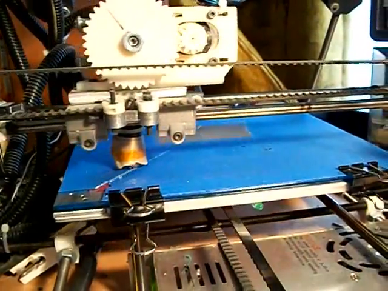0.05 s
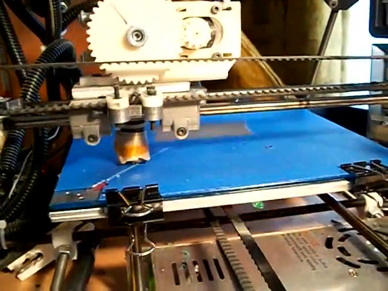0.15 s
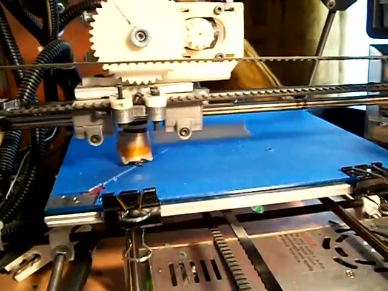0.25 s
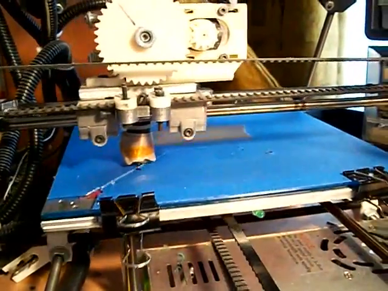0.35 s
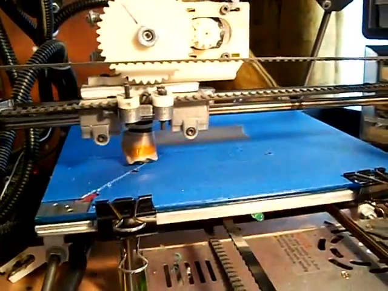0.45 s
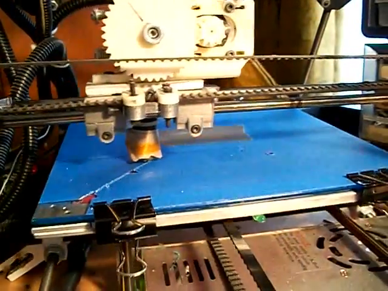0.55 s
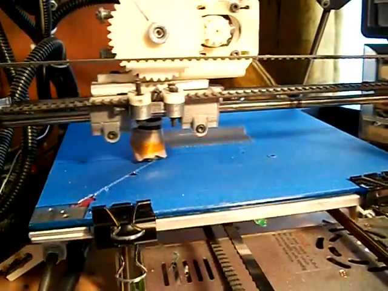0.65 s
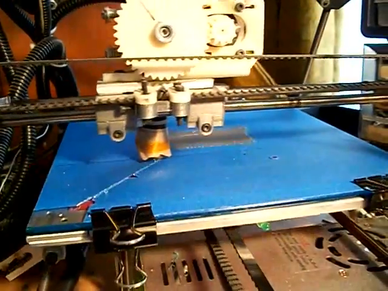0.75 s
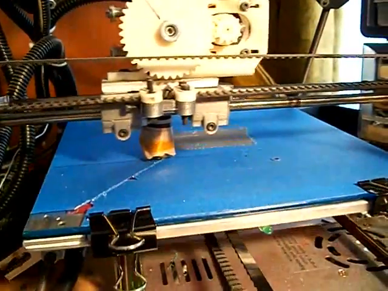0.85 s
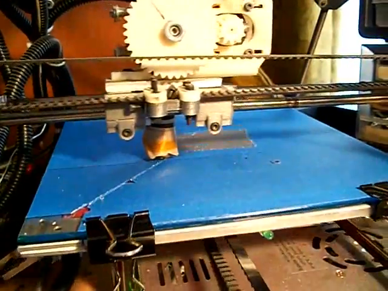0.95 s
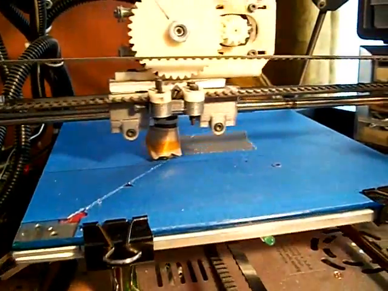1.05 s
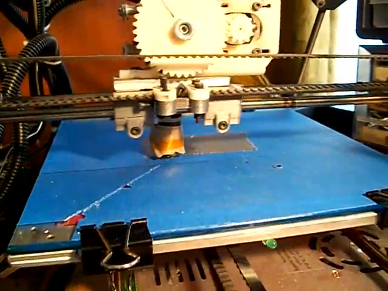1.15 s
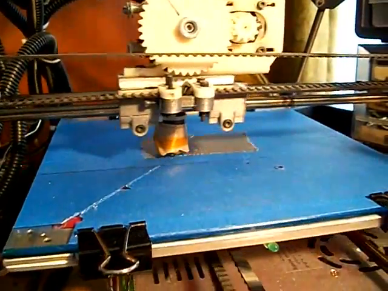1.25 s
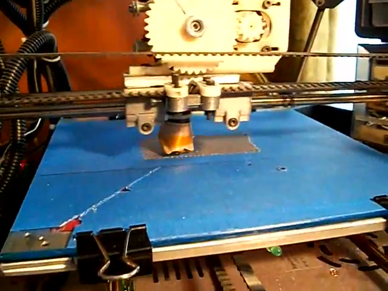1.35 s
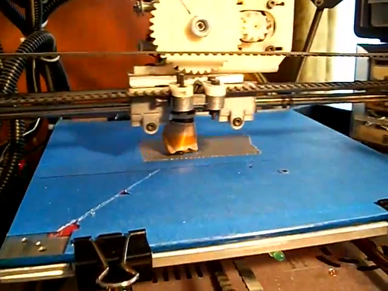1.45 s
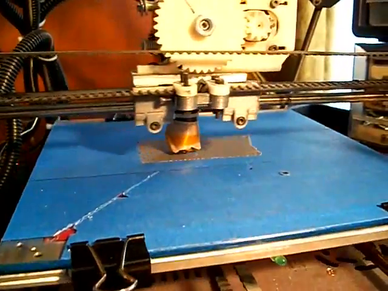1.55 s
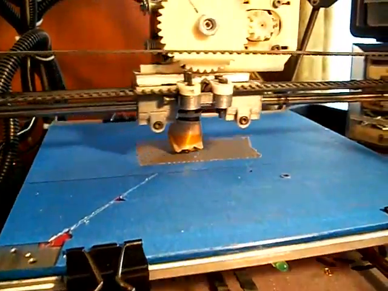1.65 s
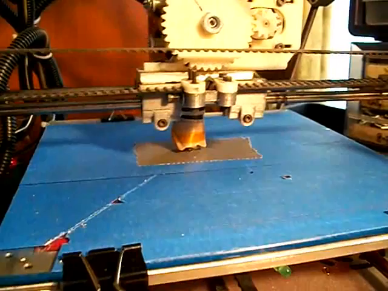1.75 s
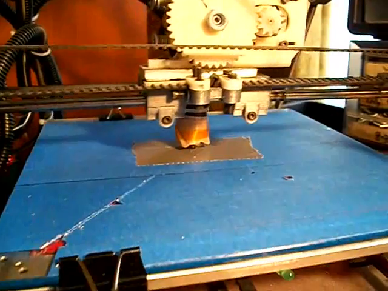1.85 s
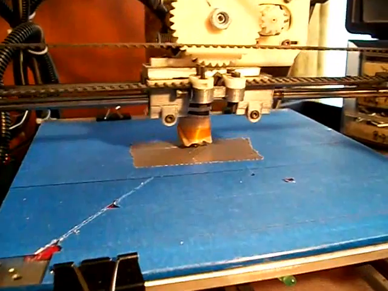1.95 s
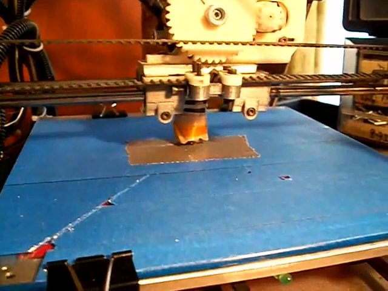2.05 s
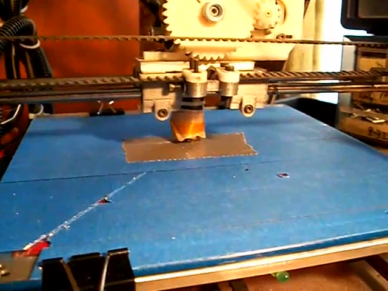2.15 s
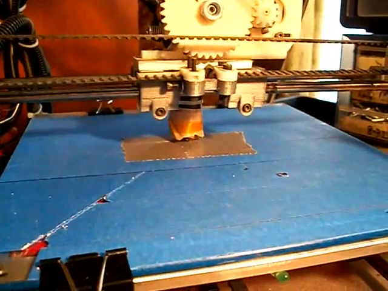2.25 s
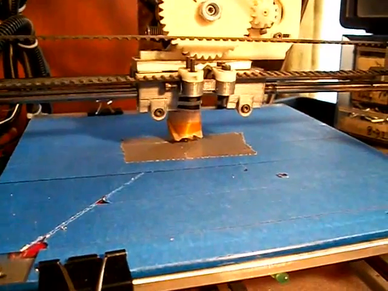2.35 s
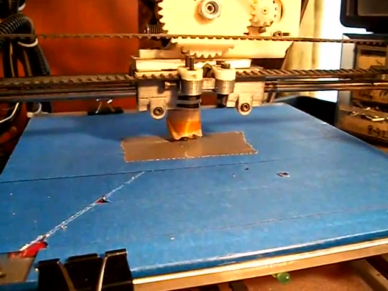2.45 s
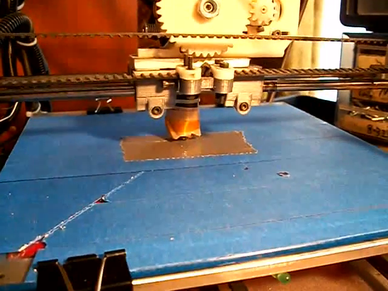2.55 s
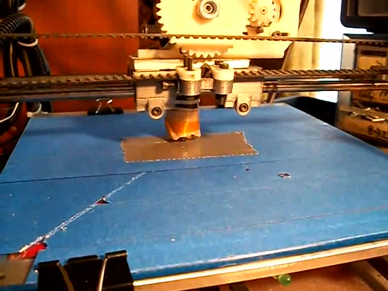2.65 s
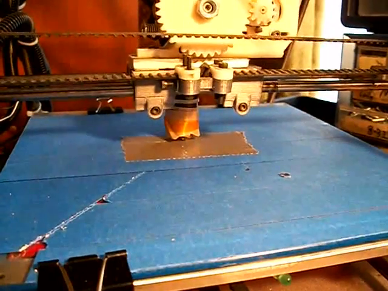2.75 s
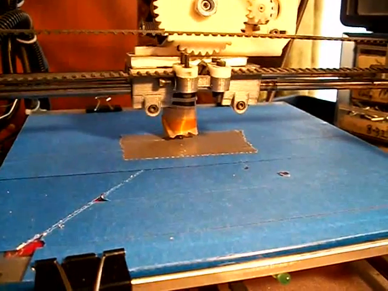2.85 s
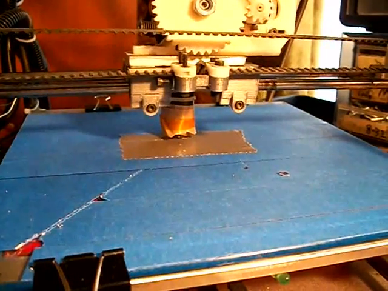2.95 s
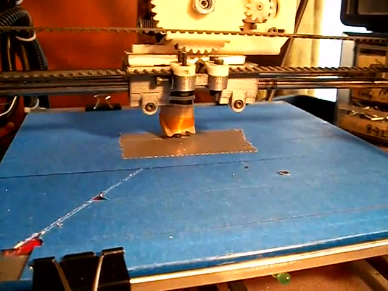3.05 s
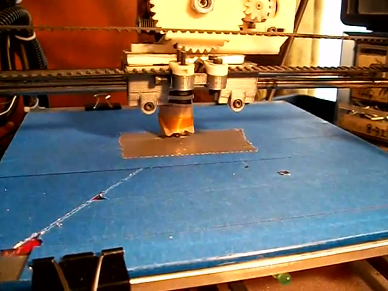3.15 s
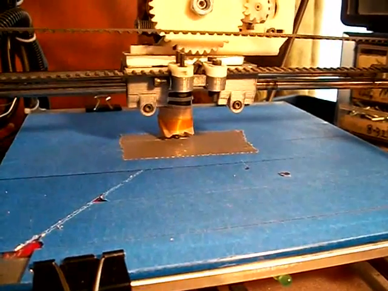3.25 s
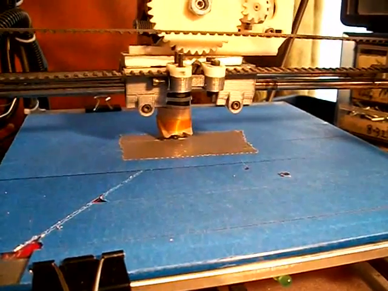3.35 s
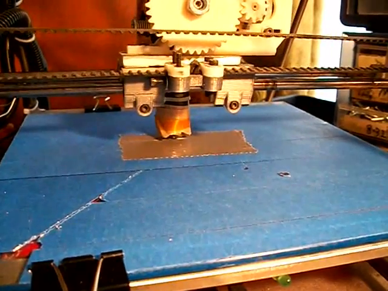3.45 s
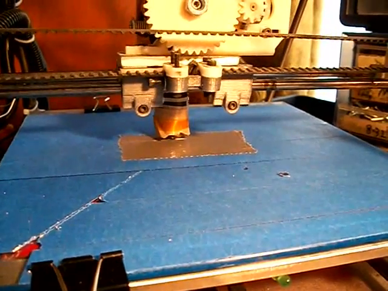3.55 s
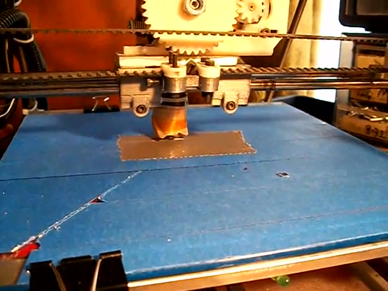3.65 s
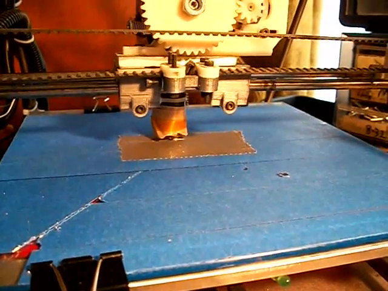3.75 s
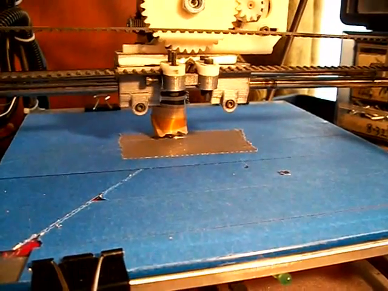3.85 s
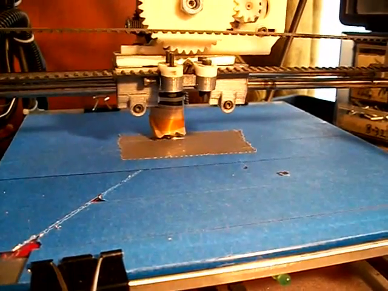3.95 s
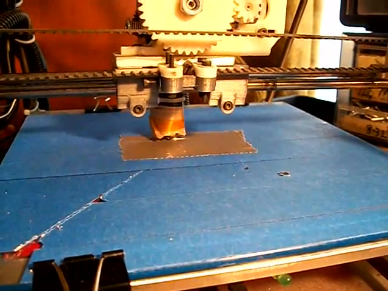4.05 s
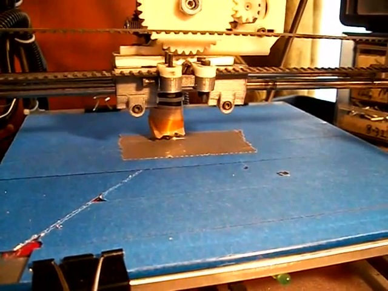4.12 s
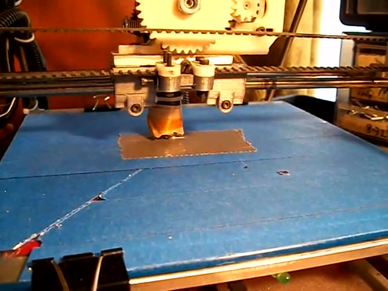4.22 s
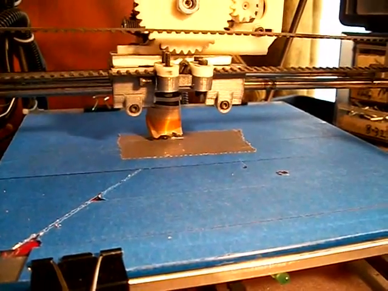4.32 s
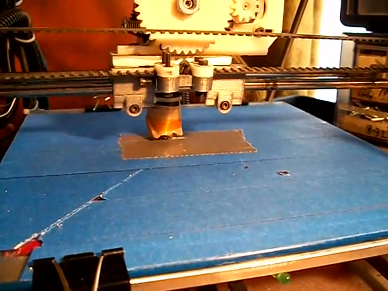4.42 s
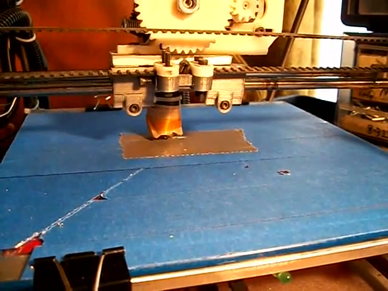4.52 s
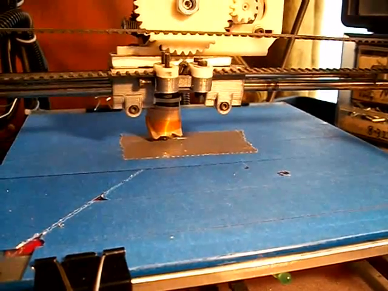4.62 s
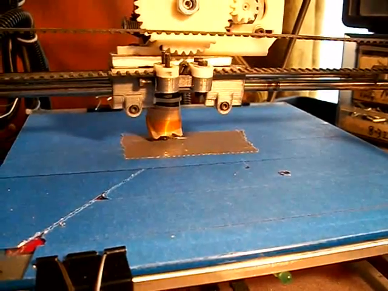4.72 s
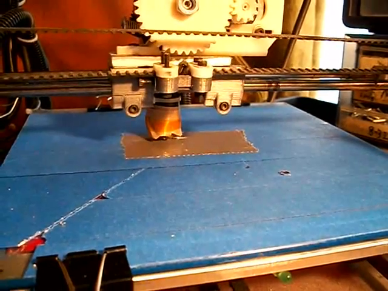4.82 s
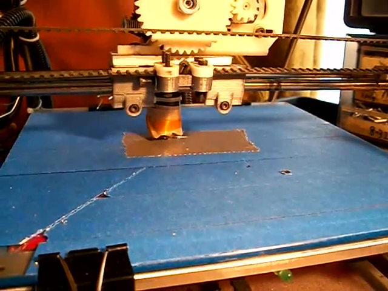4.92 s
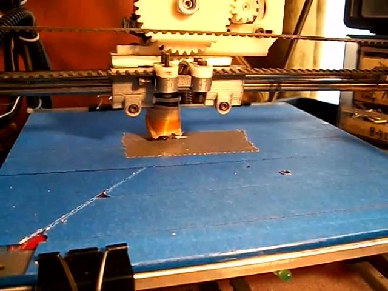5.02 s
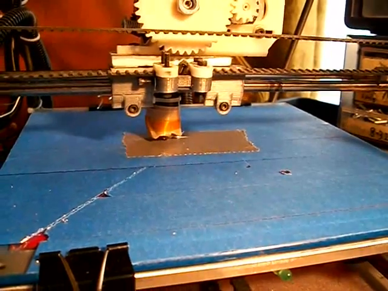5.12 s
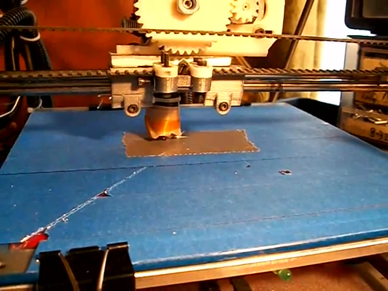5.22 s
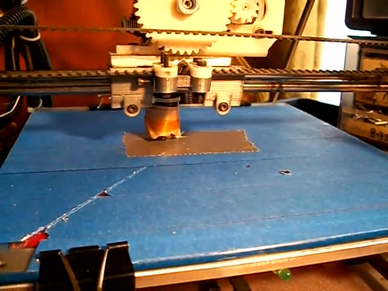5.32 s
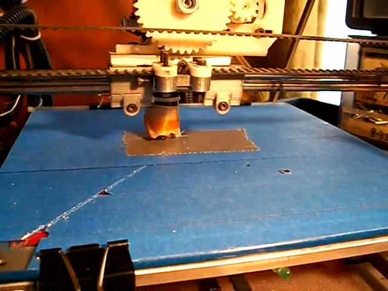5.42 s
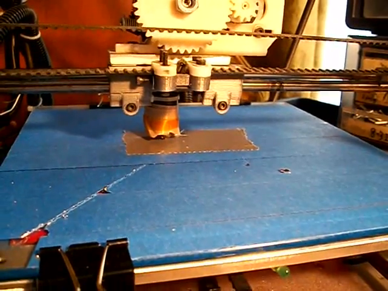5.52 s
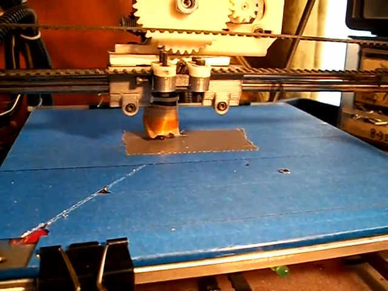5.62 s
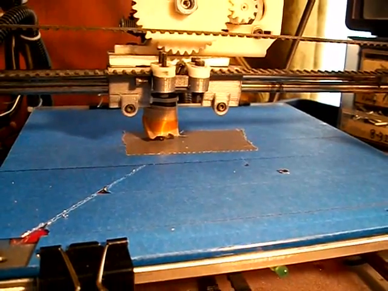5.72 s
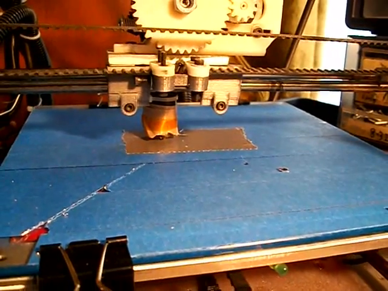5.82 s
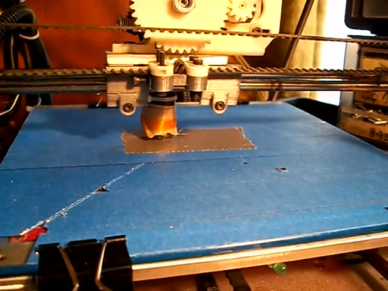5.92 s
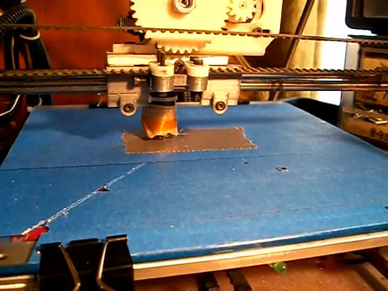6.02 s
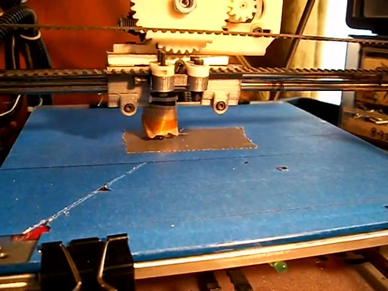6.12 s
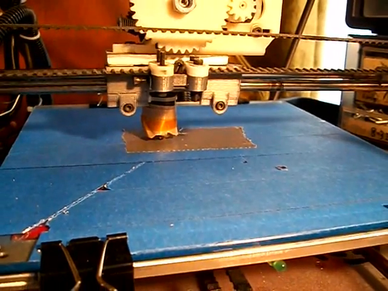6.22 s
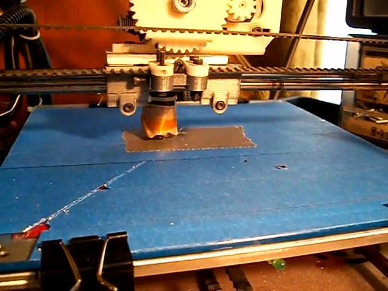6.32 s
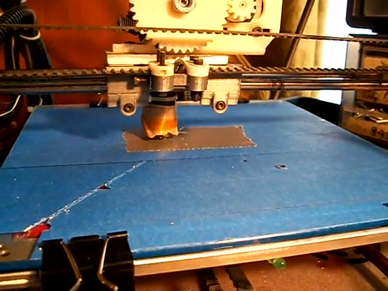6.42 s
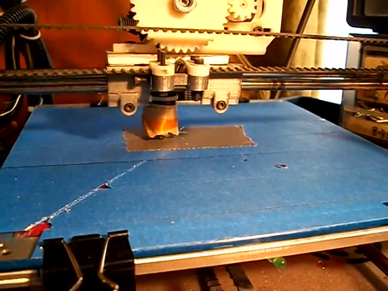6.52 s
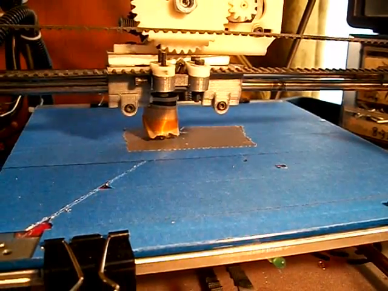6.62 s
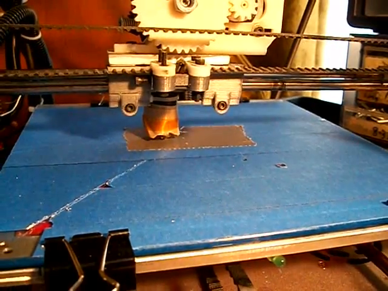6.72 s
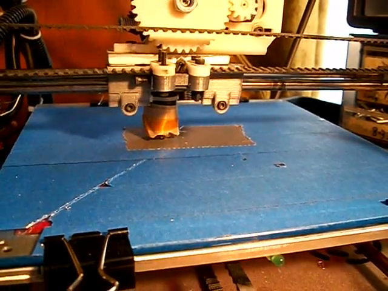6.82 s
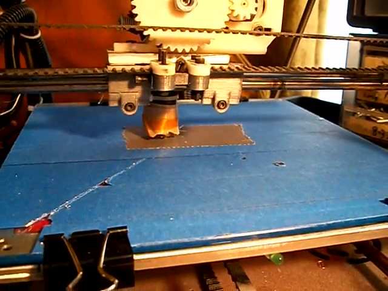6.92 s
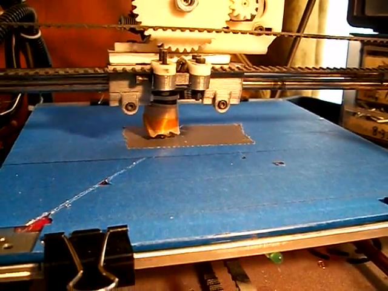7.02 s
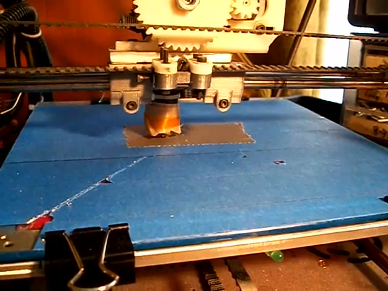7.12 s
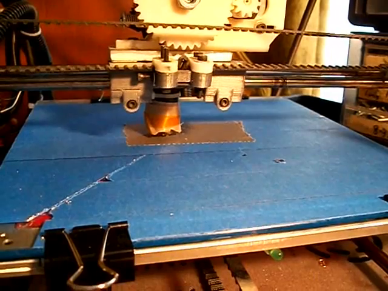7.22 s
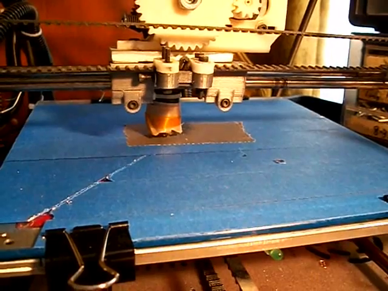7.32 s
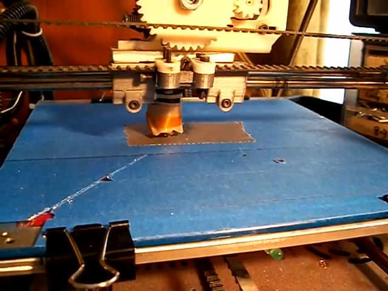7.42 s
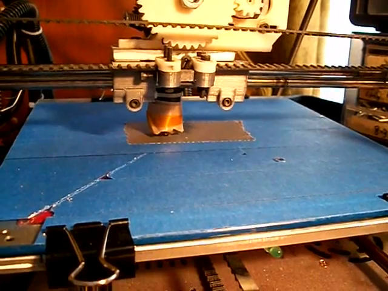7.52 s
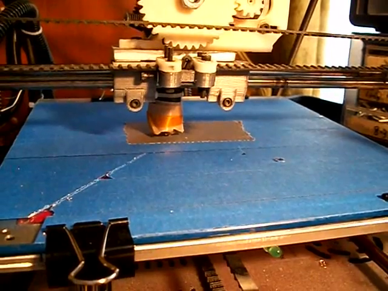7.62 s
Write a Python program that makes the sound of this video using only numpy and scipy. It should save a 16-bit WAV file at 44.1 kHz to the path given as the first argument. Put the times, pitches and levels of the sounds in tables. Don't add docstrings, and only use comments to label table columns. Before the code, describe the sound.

Arm's-length capture of a small printer, dry and almost centred. A hard click starts a loud two-second motor hum with buzzing loose parts, ending in a flurry of ticks. After a tiny gap the motors resume, quieter and rougher: pulsing steps slow down while a steady tone swells, then speed up again as that tone fades into rattling, uneven buzz. A small fan idles underneath.

```python
import sys
import numpy as np
from scipy import signal
from scipy.fft import rfft, irfft
from scipy.io import wavfile
from scipy.ndimage import uniform_filter1d, map_coordinates

SR = 44100
rng = np.random.default_rng(int(sys.argv[2]) if len(sys.argv) > 2 else 0)


def boost_factor(decibels):
    exponent = np.asarray(decibels, float) / 20
    return 10 ** exponent


def generate_wav(sig):
    pcm = np.round(np.clip(np.atleast_2d(sig).T, -1, 1) * 32767).astype(np.int16)
    wavfile.write(sys.argv[1], SR, pcm)


N = 338200
T = np.arange(N) / SR

STEP_HZ, STOP_S = 37.55, 2.142
LOCK_HZ = 187.6
# t/s, motor load/dB, bearing rattle/dB
TRAVEL = [(0.0, -18.5, -37), (0.05, -15.5, -41), (0.25, -17.5, -42.5), (0.42, -17, -47.5),
          (0.65, -16.5, -41.5), (0.85, -15.5, -47), (0.89, -15, -42), (1.86, -16.5, -47.5),
          (2.14, -16, -41.5)]
# t/s, level/dB
EFFORT = [(2.34, -2.9), (2.6, 0), (3.0, -2), (3.6, 2), (4.2, -0.5), (4.8, 1), (5.4, 1.5), (6.0, 0.45),
          (6.6, 0.4), (7.2, -0.8), (7.67, -2.9)]


def curve(rows, t=T):
    s, *columns = np.transpose(rows)
    return [np.interp(t, s, c) for c in columns]


def evened(x, seconds=None):
    power = np.mean(x ** 2)
    if seconds:
        size = int(seconds * SR)
        power = uniform_filter1d(uniform_filter1d(x ** 2, size), size)
    return x / np.sqrt(abs(power) + 1e-12)


def noise(points):
    f, db = np.transpose(points)
    hz = np.fft.rfftfreq(N, 1 / SR)
    shape = boost_factor(np.interp(np.log(hz + 1), np.log(f + 1), db, -99, -99))
    return evened(irfft(rfft(rng.standard_normal(N)) * shape, N))


def wander(hz, size=N):
    coarse = T[:size:128]
    knots = rng.standard_normal(int(N / SR * hz) + 2)
    return np.interp(T[:size], coarse, map_coordinates(knots, [coarse * hz], order=3))


def ring(x, modes):
    t = np.arange(5000) / SR
    body = sum(boost_factor(db) * w * t * np.exp(-np.pi * w * t) * np.sin(2 * np.pi * hz * t) for hz, w, db in modes)
    return signal.oaconvolve(x, body)[:N]


def gate(t0, t1, rise=0.0024, fall=.01):
    return np.clip((T - t0) / rise, 0, 1) * np.exp(-np.maximum(T - t1, 0) / fall)


def tone(hz, db):
    return np.sqrt(2) * boost_factor(db) * np.sin(2 * np.pi * (np.cumsum(hz + 0 * db) / SR + rng.random()))


def positions():
    corners = [5.16, 5.36, 5.45, 5.66, 5.88, 6.08, 6.25, 7.15, 7.38, 7.52, 7.7]
    knots = np.sort(np.r_[np.arange(2.2, 5.15, .1), np.arange(6.35, 7.1, .1), corners])
    angle = .51932 * (knots - 3.6605)
    bed = .07 + 54.604 * (1 - np.cos(angle))
    head = .81 + 53.33 * np.sin(angle)
    return np.interp(T, knots, bed), np.interp(T, knots, head)


def pace(position):
    return uniform_filter1d(abs(np.gradient(position)) * SR, size=4000)


def microsteps(steps, spread_db=.6, lead=.006):
    jumps = [0, -4, -10, -18, -22, -18, -10, -4]
    lumps = [(5, 1.4), (11, 0.77), (18, 5.2), (23, 2.6), (28, 1.78)]
    position = np.interp(T + lead, T, steps)
    count = np.floor(8 * position + .5).astype(int)
    at = np.flatnonzero(np.diff(count)) + 1
    lumping = np.interp(abs(np.gradient(position)[at]) * SR, *np.transpose(lumps))
    spread = spread_db * rng.standard_normal(N)[at]
    clicks = np.zeros(N)
    clicks[at] = boost_factor(np.array(jumps)[count[at] % 8] * lumping + spread)
    return clicks


def travel():
    # f/Hz, level/dB
    sidelines = [(150.7, -43.5), (188.4, -21), (301.5, -31.5), (376.8, -18), (452.2, -42), (489.9, -47.5),
                 (527.6, -47.5), (565.2, -43), (602.9, -48), (640.6, -47), (678.3, -43.5), (753.7, -51),
                 (823.6, -51.5), (861.3, -56), (899.0, -54), (936.7, -69.5), (1050, -55), (1125, -59.5)]
    n = int(2.4 * SR)
    t, load_db, tone_hz = T[:n], curve(TRAVEL)[0][:n], 5 * STEP_HZ
    out = tone(tone_hz + 1.3 * wander(16, n), load_db - 5 + 1.7 * wander(11.24, n))
    rings_on = boost_factor(-3.5) * out * gate(STOP_S, STOP_S + .012, rise=0.016, fall=0.019)[:n]
    out += tone(2 * tone_hz + 0.85 * wander(13, n), load_db - 1 + 0.69 * wander(11, n))
    beat = np.cos(np.pi * 3.05 * (t - .29)) + 0.21
    out += tone(301.7, -30.5 - 2.5 * t + 2.1 * wander(9, n)) * beat
    for hz, db in sidelines:
        if min(abs(hz - 188), abs(hz - 376), abs(hz - 301)) > 15:
            order_hz = STEP_HZ * round(hz / STEP_HZ)
            out += tone(order_hz + 0.64 * wander(5, n), db + 1.0 + 2.4 * wander(5, n))
    return np.r_[out * gate(-1, STOP_S, fall=0.014)[:n] + rings_on, np.zeros(N - n)]


def arc():
    bed_turns, head_turns = positions()
    speed = np.maximum(pace(head_turns), LOCK_HZ / 8)
    grip = gate(0, 4.9, fall=.12) / (1 + ((16 * speed - 377.8) / 18.6) ** 4)
    motors = head_song(bed_turns, speed, grip) + bed_whine(bed_turns)
    return (frame_knocks(bed_turns, grip) + motors) * gate(2.343, 9, rise=.015)


def frame_knocks(bed_turns, grip):
    # f/Hz, width/Hz, level/dB
    upper_modes = [(367, 42, 0), (415, 36, -14), (340, 40, -17), (735, 90, -27), (1085, 70, -32),
                   (560, 80, -34)]
    lower_modes = [(195.1, 19, 11.5), (222, 15.7, 4), (265, 29, 5.5), (28, 5.9, -26)]
    boom_modes = [(101.7, 23, 0)]
    loose_modes = [(345, 75, 0), (380, 70, -2), (275, 60, -11), (700, 200, -17)]
    frame_gait = [(1.98, -30, -36, -53), (5, -25.5, -45, -51), (9.05, -27.5, -32, -40),
                  (12, -28, -32.5, -45.5), (16.45, -22, -37.5, -46), (19.2, -21.5, -31.5, -45.5),
                  (22.6, -22.5, -38.5, -49), (25.18, -22, -29, -39), (26.6, -25.5, -27, -42),
                  (27.2, -29, -31, -49)]
    back_changes = (-.5, 3, -3)
    # t/s, level/dB
    turn_steps = [
        (3.511, -22.5),
        (3.585, -16),
        (3.732, -22),
    ]
    clicks = microsteps(bed_turns)
    modes = (upper_modes, loose_modes, lower_modes, boom_modes)
    upper, loose, lower, boom = (evened(ring(clicks, m), .16) for m in modes)
    bed_speed = pace(bed_turns)
    crawl = np.clip((14 - bed_speed) / 4, 0, .8)
    slack = np.sqrt(crawl) * loose * np.clip(bed_speed / 12, .5, 1)
    upper = np.sqrt(1 - crawl) * upper + slack
    upper = upper * (1 - .8 * grip)
    upper = upper + boost_factor(-25) * (upper ** 2 - 1) + boost_factor(-46.0) * upper ** 3
    drag_db = 0.39 * curve(EFFORT)[0]
    running_back = gate(6.685, 9, rise=0.33)
    knock = sum(boost_factor(db + drag_db + back_db * running_back) * part
                for db, back_db, part in zip(curve(frame_gait, bed_speed), back_changes, (upper, lower, boom)))
    moving = 1 - gate(3.36, 3.93, rise=0.045, fall=0.021)
    lone = np.zeros(N)
    for s, db in turn_steps:
        lone[int(s * SR)] = boost_factor(db) * 5
    return knock * moving + ring(lone, upper_modes)


def head_song(bed_turns, speed, grip):
    head_orders = [(1, -15.5), (3.95, -17.5), (5.37, -17.5), (6.974, -9), (7.98, 1), (9, -17), (12.3, -22),
                   (13.34, -18), (16.4, -26), (24.45, -30), (21.06, -38.5), (21.83, -29), (26.06, -27.5),
                   (40.2, -35.5), (39.3, -41), (43.8, -43.5)]
    turns, sing, waver = np.cumsum(speed) / SR, np.zeros(N), wander(20)
    held, free = gate(0, 5.66, fall=.07), gate(0, 4.85, fall=0.28)
    for k, db in head_orders:
        under_db = -.6 * np.clip(180 - k * speed, 0, 30)
        level = boost_factor(db + under_db + 0.18 * waver)
        sing += level * np.cos(2 * np.pi * k * turns) * (held if round(k) == 8 else free)
    lock_db = 5.5 / (1 + ((8 * speed - LOCK_HZ) / 2.7) ** 2)
    sing *= boost_factor(-27 + lock_db) * np.sqrt(2)
    sing *= boost_factor(-6 * np.clip((T - 4.8) / 0.22, 0, 1))
    surge = np.cos(np.pi * np.interp(T - 0.0022, T, bed_turns)) ** 4 * 1.2
    octave = sum(boost_factor(db) * np.cos(2 * np.pi * k * turns) for k, db in ((16, 0), (24, -21), (32, -22)))
    return sing + boost_factor(-21 + 1.9 * wander(14)) * 2 * grip * surge * octave


def bed_whine(bed_turns):
    bed_orders = [(6, -37), (13, -26.5), (23, -47.5), (24, -47.5), (25, -58), (26, -45.5), (32, -59.5),
                  (39, -52.5)]
    whine = sum(boost_factor(db + 1.2 * wander(4.1)) * np.cos(2 * np.pi * k * bed_turns) for k, db in bed_orders)
    fast = np.clip((pace(bed_turns) - 25.5) / 2.2, .25, 1)
    return np.sqrt(2) * whine * fast * gate(5.66, 9, rise=.1)


def rattle():
    # f/Hz, level/dB per Hz
    bearing_bands = [(710, -43.5), (1200, -18.5), (1240, -19.5), (1430, -17.5), (1630, -12), (1720, 0),
                     (1800, 0.5), (2220, -4.5), (2350, -2.5), (2860, -2.5), (3110, -16.5), (3530, -9),
                     (3810, -19.5), (4700, -24.5), (5020, -19), (6530, -32), (11000, -55.5)]
    body_bands = [(250, -32), (420, 1), (470, -6), (613, -4.5), (751, -1.5), (817, -13.5), (919, -6.5),
                  (1010, -15), (1110, -9), (1240, -24.5), (1500, -18), (1950, -39.5), (3300, -120)]
    hiss_bands = [(710, -35.5), (1200, -6.5), (1440, -18), (1760, -8), (1950, -9), (2370, -3), (2830, -8),
                  (2960, -12), (3260, -9.5), (3630, -12.5), (3930, -15), (4560, -11.5), (5020, -18),
                  (6530, -26.5), (7600, -29), (11000, -50.5)]
    # f/Hz, width/Hz, level/dB
    ball_modes = [(3670, 290, 2), (2520, 280, -16.5)]
    rattle_gait = [(2, -54, -42, 0.9), (5, -48.5, -38, 0.38), (11.3, -43.5, -34.5, 0.6),
                   (14.8, -45, -34, 0.64), (18.1, -40.5, -27.5, 0.34), (21, -42.5, -31, 0.35),
                   (22.7, -41.5, -28.5, 0.05), (25.1, -45.5, -33, 1), (29.6, -48, -42, 0.34)]
    bed, head = positions()
    arc_db, arc_body_db, slide = curve(rattle_gait, pace(bed))
    slide = np.clip(slide, 0, 1)
    drag = boost_factor(curve(EFFORT)[0])
    level = boost_factor(curve(TRAVEL)[1] + 1.33) * gate(-1, STOP_S + 0.013, fall=0.021)
    t = np.arange(3000) / SR
    puff = t * np.exp(-t / .006)
    bed_shake, head_shake = (evened(signal.oaconvolve(microsteps(a, 1.3, .008), puff)[:N], .3)
                             for a in (bed, head))
    buzz = 1 + 0.37 * np.cos(2 * np.pi * 5 * STEP_HZ * T) + 0.14 * wander(30)
    on_arc, grain, hiss = T > 2.345, boost_factor(1.3 * wander(150)), noise(hiss_bands)
    by_bed = np.sqrt(1 - slide) * bed_shake * noise(bearing_bands)
    by_head = np.sqrt(slide) * (.55 + .62 * np.minimum(head_shake, 2.2)) * hiss
    bearings = np.where(on_arc, drag * boost_factor(arc_db) * (by_bed + by_head), level * buzz * hiss)
    arc_body = drag * boost_factor(arc_body_db - 3) * (.5 + 0.47 * bed_shake)
    body = np.where(on_arc, arc_body, level * boost_factor(4.5) * buzz) * noise(body_bands)
    strikes = microsteps(head, 4.9, 0.0026) * np.sign(rng.standard_normal(N))
    pings = boost_factor(-53.5) * evened(ring(strikes, ball_modes), .3)
    return grain * (bearings + body) + pings * gate(3.25, 3.56, rise=0.22, fall=.15)


def ticks():
    # t/s, level/dB, f/Hz, t60/s
    knocks = [
        (0.0094, -15, 2400, 0.01),
        (0.129, -17, 1700, 0.029),
        (0.263, -24.5, 2010, 0.015),
        (1.925, -26, 2320, 0.026),
        (1.9566, -22, 1987, 0.023),
        (2.0357, -25.5, 3163, 0.043),
        (2.0815, -26, 1900, 0.047),
        (2.1622, -26, 1630, 0.022),
        (2.1994, -36, 3840, 0.041),
        (2.216, -30, 1710, 0.034),
    ]
    # start t/s, end t/s, level/dB
    chatter = [
        (1.926, 1.953, -44),
        (2.025, 2.091, -39.5),
    ]
    out, t = np.zeros(N), np.arange(4000) / SR
    for s, db, hz, t60 in knocks:
        decay = boost_factor(-60 * t / max(t60, .005))
        burst = rng.standard_normal(len(t)) * np.minimum(t / 0.0011, 1) * decay
        band = signal.butter(2, [hz * 0.7, hz * 1.55], "bandpass", fs=SR)
        out[int(s * SR):][:len(t)] += boost_factor(db) * 2 * signal.lfilter(*band, burst)
    pulses = np.diff(np.floor(T * 188), prepend=0)
    squeak = evened(ring(pulses, [(3290, 230, -4.0), (2220, 1400, -3.5), (4660, 470, -6)]))
    return out + squeak * sum(boost_factor(db) * gate(a, b, fall=0.0029) for a, b, db in chatter)


def fan():
    # f/Hz, level/dB per Hz
    air_bands = [(12, -27.5), (20, -8), (54, -7), (143, -3), (216, -4), (273, 2), (413, -14), (521, -9.5),
                 (703, -16), (886, -20.5), (1070, -20), (1170, -32.5), (4170, -30), (4580, -34),
                 (5020, -34.5), (6530, -43), (11000, -59.5)]
    # f/Hz, level/dB
    blades = [(210.4, -42), (410.6, -52), (1052, -59.5), (670, -65)]
    air = boost_factor(-40.5 + 0.78 * wander(29)) * noise(air_bands)
    return air + sum(tone(hz * (1 + .002 * wander(5.5)), db + 3.3 * wander(14)) for hz, db in blades)


def scene():
    x = travel() + arc() + rattle() + ticks() + fan()
    late = irfft(rfft(x) * np.exp(-2j * np.pi * np.fft.rfftfreq(N) * 3.64), N)
    return np.array([late, x]) * np.clip((N - np.arange(N)) / 40, 0, 1)


def band_limit(x):
    return signal.sosfilt(signal.butter(12, 12280, fs=SR, output="sos"), x)


def record(dry):
    dry = signal.sosfilt(signal.butter(1, 26, "highpass", fs=SR, output="sos"), dry)
    dry = signal.sosfiltfilt(signal.butter(12, 8050, fs=SR, output="sos"), dry, padtype="even")
    bass = signal.sosfilt(signal.butter(4, 600, fs=SR, output="sos"), dry.mean(0))
    mirror = boost_factor(-59.0) * bass * np.cos(2 * np.pi * 12000 * T)
    return band_limit(dry + mirror)


dry = scene()
out = record(dry)
generate_wav(out)
```